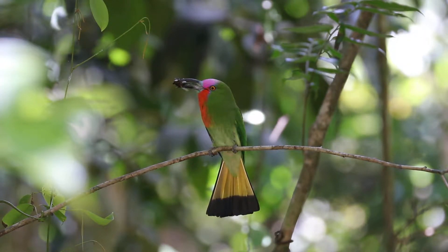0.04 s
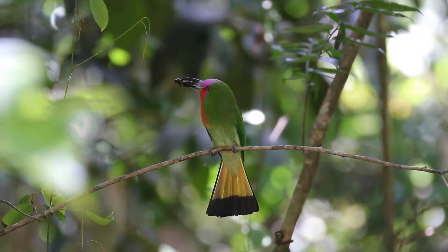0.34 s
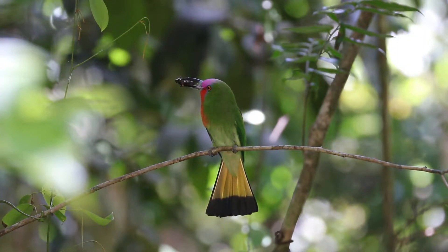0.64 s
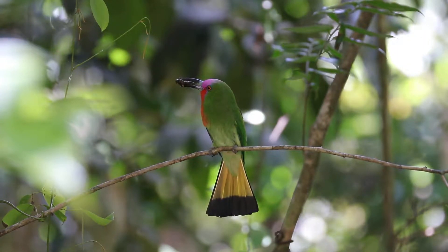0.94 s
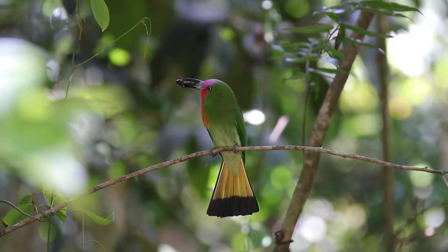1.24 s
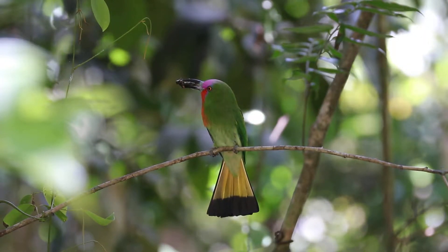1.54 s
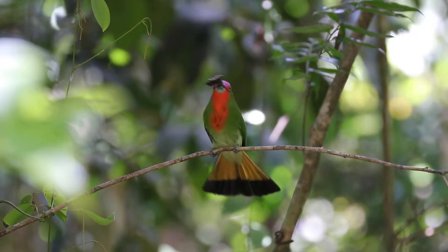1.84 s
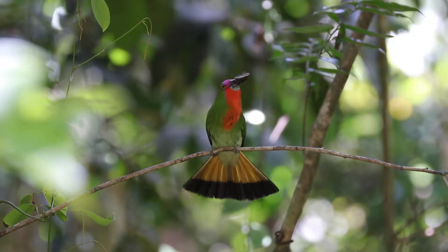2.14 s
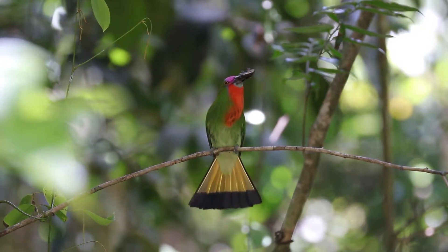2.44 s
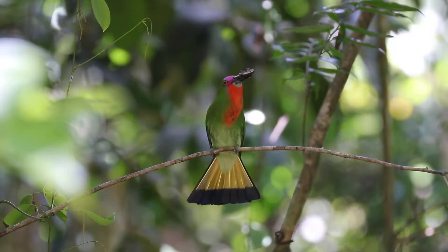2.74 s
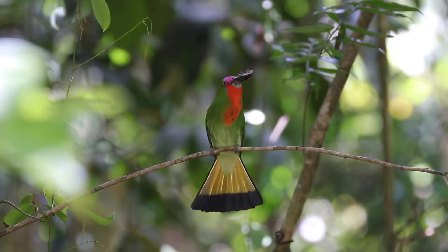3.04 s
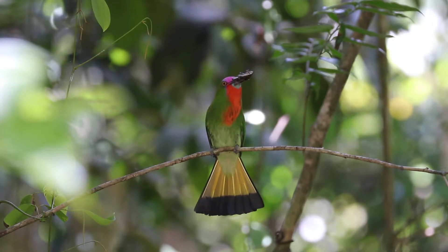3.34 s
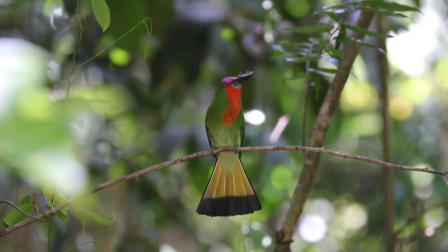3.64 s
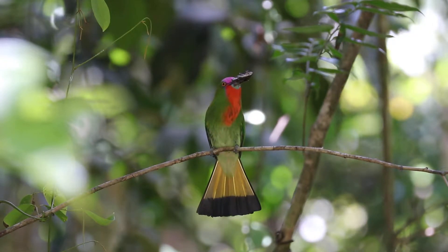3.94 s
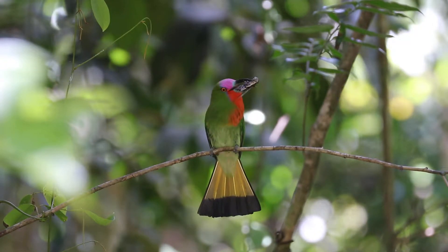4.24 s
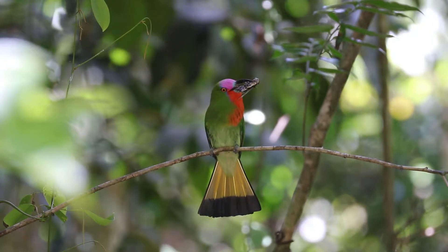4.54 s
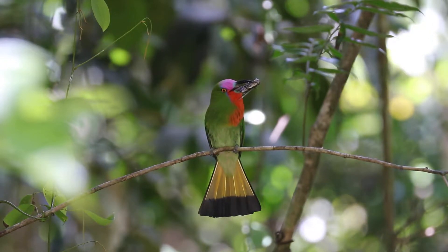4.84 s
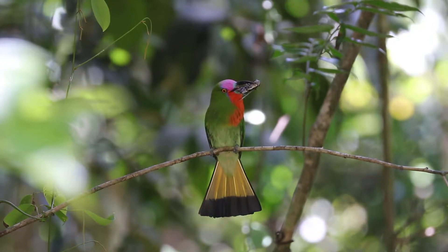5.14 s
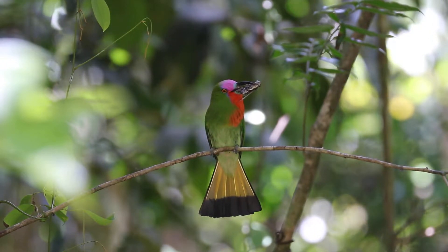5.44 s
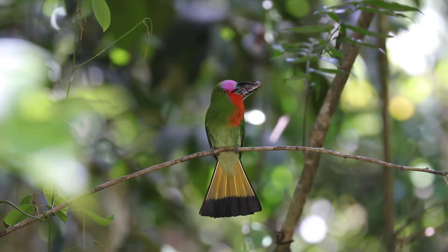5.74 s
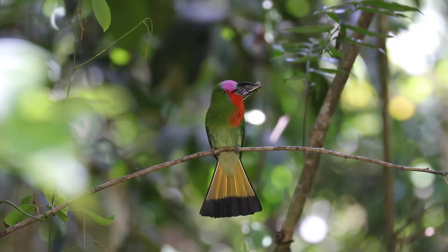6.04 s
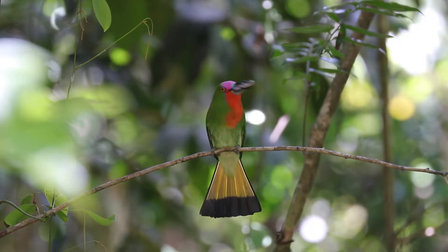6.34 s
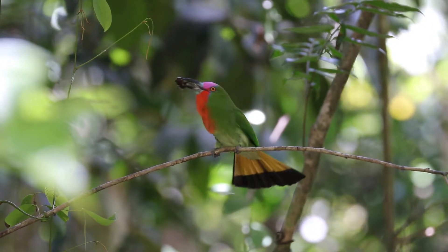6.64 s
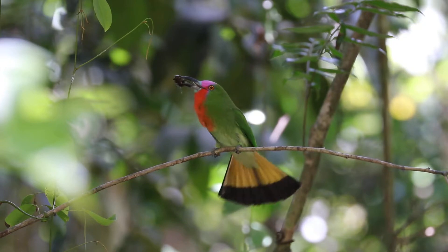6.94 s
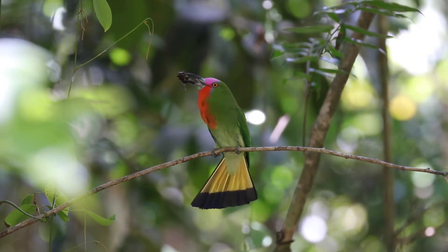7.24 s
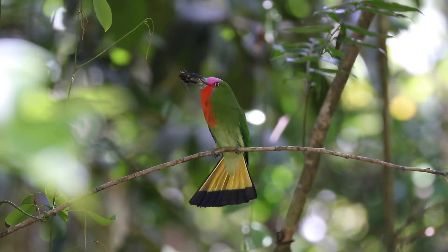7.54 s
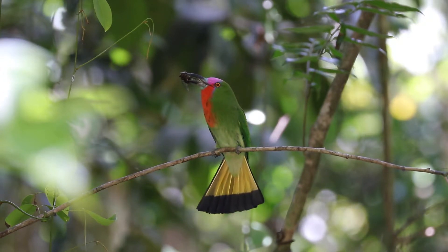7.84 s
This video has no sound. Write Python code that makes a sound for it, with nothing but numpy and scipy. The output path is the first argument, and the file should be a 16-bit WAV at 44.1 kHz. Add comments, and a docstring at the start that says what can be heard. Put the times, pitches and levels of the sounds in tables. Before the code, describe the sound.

A soft, even hiss of forest air and a thin, high, slightly throbbing insect drone run for the whole eight seconds, heard in stereo from one spot. At about 1.7 seconds a bird on a nearby branch gives a harsh rattle, much louder than the background: eight raspy notes in roughly one second, each lower, duller and softer, slowing slightly. Leaves and trunks add a short echo. A faint insect whine comes and goes around 2.7 seconds. Another insect's buzz swells from about 4.8 to 5.8 seconds, while a distant bird gives three faint falling chips at 5.0, 5.5 and 5.7 seconds. At 6.5 seconds the near bird repeats its descending rattle, fading by about 7.5 seconds. A faint low murmur rises beneath it, and another thin whine appears around 7.6 seconds as the insects carry on.

```python
"""Bee-eater in a humming forest

A stereo pair stands among trees, in the hiss of the air and the thin drone of insects' tymbals.
From a nearby branch a bee-eater rattles twice: eight harsh notes that sink in pitch and fade.
Each note is a train of very short syrinx bursts shaped by the throat; leaves and trunks scatter it.
Between the rattles, farther off, another bird chips three times."""
import sys
import numpy as np
from scipy import signal
from scipy.fft import rfft, irfft
from scipy.io import wavfile

SR = 44100
rng = np.random.default_rng(int(sys.argv[2]) if len(sys.argv) > 2 else 0)


def wrap_up_sound(samples):
    """Save the sound to the file named by the first command line argument, as 16-bit audio."""
    columns = np.atleast_2d(samples).T
    # keep every value between -1 and 1, then stretch to whole-number steps
    tamed = np.clip(columns, -1, 1)
    steps = np.round(tamed * 32767).astype(np.int16)
    wavfile.write(sys.argv[1], SR, steps)


N = 351918
TIME, FREQS = np.arange(N) / SR, np.fft.rfftfreq(N, 1 / SR) + 1e-3
SIDES = np.array([[1], [-1]])  # left and right microphone; a pan_db is left minus right


def undb(db):
    """Decibels to gain."""
    return 10 ** (np.asarray(db) / 20)


def unit(x):
    """Scale to rms 1."""
    return x / np.sqrt(np.mean(x ** 2))


def resonance(f, hz, width_hz):
    """Complex response of one resonance, gain 1 at the centre."""
    return 1 / (1 + 1j * (f ** 2 - hz ** 2) / (f * width_hz))


def noise(gain):
    """Unrelated noise at each microphone, with the given spectrum."""
    return irfft(rfft(rng.standard_normal((2, N))) * gain, N)


def wander(rate_hz):
    """A random drift with a spread near 1."""
    knots = rng.standard_normal(400)
    return 1.127 * np.interp(TIME * rate_hz, np.arange(len(knots)), knots)


def swell(middle_s, length_s):
    """A rise, a rounded hold and a fall."""
    return np.exp(-(2 * (TIME - middle_s) / length_s) ** 4)


def place(starts, sounds):
    """Lay sounds on the time line."""
    out = np.zeros(N + SR)
    for s, sound in zip(starts, sounds):
        out[int(s * SR):int(s * SR) + len(sound)] += sound
    return out[:N]


# The air all around the microphones: frequency_hz, density_db, pan_db, left_right_correlation
AIR_SPECTRUM = [(20, -89.2, 0.0, 0.66), (55, -78.6, 1.3, 0.81), (100, -83.2, 2.0, 0.33),
                (190, -83.3, 1.4, 0.48), (420, -84.7, 1.7, 0.26), (650, -89.3, 1.4, 0.13),
                (1300, -89.4, -0.8, 0.02), (2500, -86.8, -1.6, -0.18), (3800, -88.1, -1.3, -0.11),
                (5700, -90.2, -1.5, 0.06), (6600, -88.8, -1.8, 0.01), (7200, -84.8, -1.2, 0.02),
                (8600, -88.9, -3.8, 0.03), (11000, -92.1, -5.6, -0.0), (15300, -102.0, -5.5, 0.03)]


def forest_air(murmur_edge_hz=45, chorus_db=-65.5, flicker_db=2):
    """An even hiss, a low far murmur that swells late, and a flickering chorus of high insects."""
    hz, *columns = np.transpose(AIR_SPECTRUM)
    db, pan_db, correlation = (np.interp(np.log(FREQS), np.log(hz), c) for c in columns)
    mid, side = rfft(rng.standard_normal((2, N))) * np.sqrt((1 + SIDES * correlation) / 2)
    air = (mid + SIDES * side) * undb(db + SIDES * pan_db / 2) * np.sqrt(SR / 2)
    low = 1 / (1 + (FREQS / murmur_edge_hz) ** 2)
    hiss = irfft(air * (1 - low), N)
    murmur = irfft(air * low, N) * undb(-1 + 7.2 * swell(middle_s=7.1, length_s=3.5))
    chorus = unit(noise(resonance(FREQS, 7180, 470) ** 2 + .12 * resonance(FREQS, 7870, 400) ** 2))
    return hiss + murmur + chorus * undb(chorus_db + flicker_db * (wander(3.4) + wander(4.2)))


# The drone as it reaches the microphones: time_s, level_db
DRONE_LEVELS = [(0.0, -51.5), (0.11, -56), (0.51, -52), (3.53, -57), (4.67, -55), (4.85, -62), (6.05, -51),
                (6.07, -54), (7.47, -54.5), (7.67, -58.5), (7.98, -53)]
# How the drone's loudness wavers between left and right: time_s, pan_db
DRONE_BALANCE = [(0.0, -4), (3.56, 3), (6.22, -5.5), (6.6, 2), (6.65, -1), (7.98, -2.5)]
# Body resonances, each applied three times over: pitch_hz, half_width_hz, relative_db
BODY_MODES = [(4757, 46, 0), (4245, 60, -14), (5280, 70, -17)]


def droning_insects(throb_hz=24.1, throb_depth=.3):
    """Sharply tuned bodies kept ringing by tymbals that throb; the forest smears the phase."""
    db, pan_db = (np.interp(TIME, *np.transpose(curve)) for curve in (DRONE_LEVELS, DRONE_BALANCE))
    body = sum(undb(mode_db) * unit(abs(resonance(FREQS, hz, 2 * half_width)) ** 3)
               for hz, half_width, mode_db in BODY_MODES)
    ring = unit(noise(body))
    ring /= np.sqrt(abs(signal.hilbert(ring)) + .4)  # a singer is steadier than plain noise
    throb = np.sin(2 * np.pi * np.cumsum(throb_hz * (1 + .0315 * wander(2.17))) / SR)
    song = ring * (1 + throb_depth * np.array([[.5], [1]]) * throb)  # half as deep on the left
    return song / np.mean(abs(song.mean(axis=0))) * undb(db + SIDES * pan_db / 2)


# Lines of the buzz, one click rate apart: pitch_hz, relative_db
BUZZ_COMB = [(4215, -70), (4344, -67), (4479, -62), (4608, -64), (4743, -61), (4872, -65), (5001, -67),
             (5136, -65)]
# Its swells at the microphones, added to the resting buzz: middle_s, length_s, level_db
BUZZ_RISES = [(3.3, 1.3, -66.5), (5.27, 1.0, -55)]


def buzzing_insect(rest_db=-66, waver=.001265, pan_db=-2):
    """Regular tymbal clicks make a comb of lines that swells faintly, then strongly."""
    # the path to each microphone wavers on its own
    clock = np.cumsum(1 + waver * np.array([wander(25), wander(25)]), axis=1) / SR
    lines = sum(undb(db + 2 * wander(4.7)) * np.sin(2 * np.pi * (hz * clock + rng.random((2, 1))))
                for hz, db in BUZZ_COMB)
    loudness = undb(rest_db) + sum(undb(db) * swell(s, length) for s, length, db in BUZZ_RISES)
    return unit(lines) * loudness * undb(SIDES * pan_db / 2)


# The bee-eater's tone at the syrinx: harmonic, relative_db
SYRINX_PARTIALS = [(1, -6.5), (2, -11), (3, -6), (4, 0), (5, -26)]


def syrinx(t, length_s, rate_hz, tone_hz, onset_db, fade_db, burst_s=.00474, jitter_s=.000203):
    """Membranes open in quick uneven bursts of falling tone; gives rasping tone, overtones and gate."""
    beats = np.arange(16)[:, None] / rate_hz
    late, loud, sharp, wide = rng.standard_normal((len(beats), 4)).T[:, :, None]
    start = .0001 + beats * (1 + 1.357 * beats) + jitter_s * late  # the bursts slow down
    progress = start / length_s
    hz = tone_hz * (1 + .268 * (.5 - progress) + .059 * sharp)  # the pitch sinks through the note
    age = np.clip((t - start) / (burst_s * np.exp(.14 * wide)), 0, 1)  # 0 to 1 through each burst
    size = undb(onset_db * np.exp(-start / .011) + fade_db * progress ** 2 + .6 * loud)
    within_note = np.clip((length_s - start) * rate_hz, 0, 1)
    opening = size * within_note * np.sin(np.pi * age ** .63)  # opens fast, closes more slowly
    phase = 2 * np.pi * hz * (t - start) * (1 + .26 * (2 / 3 - age))  # each burst slides down too
    tone = sum(undb(db) * opening * np.sin(k * phase) for k, db in SYRINX_PARTIALS).sum(axis=0)
    overtones = sum(opening * np.sin(k * phase + k * k) for k in range(7, 13)).sum(axis=0)
    gate = opening.sum(axis=0)
    rasp = undb(-10) * gate * rng.standard_normal(len(t))
    return tone + rasp, unit(overtones) * np.sqrt(np.mean(gate ** 2)), gate


# Windpipe and beak, ringing alike in every note: pitch_hz, width_hz, relative_db
AIRWAY_MODES = [(1280, 380, -7), (2060, 480, -2)]


def note(length_s, rate_hz, tone_hz, throat_hz, onset_db, fade_db, throat_width_hz=1170):
    """Syrinx bursts ring the airway and a throat resonance that glides between two pitches."""
    t = np.arange(SR // 7) / SR
    f = np.fft.rfftfreq(len(t), 1 / SR) + 1e-3
    tone, overtones, gate = syrinx(t, length_s, rate_hz, tone_hz, onset_db, fade_db)
    source = rfft(tone)
    for hz, width_hz, db in AIRWAY_MODES:
        source *= 1 + undb(db) * resonance(f, hz, width_hz)
    leak = undb(-12.5) * resonance(f, 850, 920)
    glide = 2 * np.clip(t / length_s, 0, 1) ** .8  # crossfades three throat shapes
    voice = np.zeros(len(t))
    for k, centre_hz in enumerate(np.linspace(*throat_hz, 3)):
        throat = resonance(f, centre_hz, throat_width_hz) ** 2 - leak
        steep_edge = 1 / np.sqrt(1 + (f / (1.115 * centre_hz)) ** 10)
        voice += unit(irfft(source * throat * steep_edge, len(t))) * np.clip(1 - abs(glide - k), 0, 1)
    spill = unit(irfft(source * resonance(f, 3630, 1060) ** 2, len(t)))  # a little gets past the throat
    voice += undb(-20) * min(tone_hz / 800, 1) ** 2 * spill
    voice *= np.sqrt(np.sum(gate ** 2) / np.sum(voice ** 2))
    bright_bands = resonance(f, 8300, 2600) ** 2 + undb(-3.5) * resonance(f, 10600, 3600) ** 2
    sizzle = irfft(rfft(overtones) * bright_bands, len(t))
    return voice + undb(-15.5) * (tone_hz / 720) ** 2 * sizzle  # hard, high notes sizzle most


def by_effort(slack, full, effort, bend=1):
    """A value between slack and full, for an effort of 0 to 1."""
    return slack + (full - slack) * max(effort, 0) ** bend


def rattle(start_s, gap_s, growth_s, level_db, fade_db, fade_bend, effort_sag=.27, last_note_s=.12):
    """The bird runs out of effort: its eight notes come later, longer, lower, duller and softer."""
    starts, notes = [], []
    for k, effort in enumerate(np.linspace(1, 0, 8)):
        sound = note(length_s=by_effort(.066, .047, effort) if effort > 0 else last_note_s,
                     rate_hz=by_effort(132, 172, effort),
                     tone_hz=by_effort(630, 1127, effort, bend=1.86),
                     throat_hz=[by_effort(1137, 2797, e, bend=.72) for e in (effort, effort - effort_sag)],
                     onset_db=by_effort(7, -6, effort), fade_db=by_effort(-9, -6, effort))
        starts.append(start_s + k * gap_s + growth_s * k * (k - 1) / 2)
        notes.append(sound * undb(level_db + fade_db * (1 - effort) ** fade_bend))
    return place(starts, notes)


def scatter(x, t60_s, build_s):
    """Echoes from countless surfaces, different at each microphone."""
    t = np.arange(SR) / SR
    echoes = rng.standard_normal((2, SR)) * undb(-60 * t / t60_s) * (1 - np.exp(-(t / build_s) ** 2))
    echoes /= np.sqrt(np.sum(echoes ** 2, axis=1, keepdims=True))
    return signal.oaconvolve(x[None], echoes, axes=1)[:, :N]


# Calls from the branch: start_s, first_gap_s, gap_growth_s, level_db, fade_db, fade_bend (1 is even)
BRANCH_CALLS = [(1.727, .1060, .0042, -26, -18.5, 2.18), (6.478, .110, .003, -26, -18.5, 1.8)]
# Echoes off the ground and near stems: left_delay_s, left_db, right_delay_s, right_db
NEAR_ECHOES = [(0.00248, -14, 0.00164, -18), (0.00272, -12, 0.00578, -12), (0.004, -16, 0.00652, -18),
               (0.00582, -14, 0.00748, -18), (0.00654, -14, 0.00904, -18), (0.00742, -18, 0.01364, -16)]


def bee_eater(left_lag_s=.00005, leaves_db=1, trunks_db=-4.5):
    """The direct call, a few near echoes, quick scatter from leaves and a longer tail from the trunks."""
    call = sum(rattle(*row) for row in BRANCH_CALLS)
    spectrum = rfft(call)
    pan_db = np.interp(FREQS, [1300, 2400], [2.6, -1.5])
    lag = np.exp(-1j * np.pi * FREQS * left_lag_s * SIDES)
    direct = irfft(spectrum * undb(SIDES * pan_db / 2) * lag, N)
    near = sum(np.array([undb(db) * np.roll(call, round(s * SR)) for s, db in (row[:2], row[2:])])
               for row in NEAR_ECHOES)
    leaves = scatter(irfft(spectrum * resonance(FREQS, 2000, 3200), N), t60_s=.12, build_s=.0012)
    trunks = scatter(irfft(spectrum * resonance(FREQS, 2030, 3100), N), t60_s=.49, build_s=.047)
    return direct + near + undb(leaves_db) * leaves + undb(trunks_db) * trunks


# Other insects, faint at the microphones: middle_s, length_s, pitch_hz, level_db
INSECT_WHINES = [(2.7, 1.1, 4472, -57), (7.6, 0.69, 4250, -55.5)]


def whining_insects(waver=.00089):
    """Single thin tones that come and go."""
    whines = np.zeros((2, N))
    for middle_s, length_s, hz, db in INSECT_WHINES:
        cycles = hz * np.cumsum(1 + waver * wander(22)) / SR + rng.random((2, 1))
        whines += undb(db) * swell(middle_s, length_s) * np.sin(2 * np.pi * cycles)
    return whines


# A bird far off among the trees: start_s, pitch_hz, relative_db, fall_share (of the pitch)
FAR_CHIPS = [(4.99, 2400, -52.5, .4), (5.485, 2270, -51.5, 0.087), (5.74, 2400, -53, 0.44)]


def far_bird(length_s=.045):
    """Short falling chips that reach the microphones only as scatter from the trees."""
    t = np.arange(int(length_s * SR)) / SR
    starts, chips = [], []
    for start_s, hz, db, fall in FAR_CHIPS:
        phase = 2 * np.pi * hz * t * (1 + fall * (1 - t / length_s) / 2)
        starts.append(start_s)
        chips.append(undb(db) * np.hanning(len(t)) * np.sin(phase))
    return 2 * scatter(place(starts, chips), t60_s=.14, build_s=.005)


def scene():
    """Two birds over the insects and the air, heard from one spot in the forest."""
    birds = bee_eater() + far_bird()
    insects = droning_insects() + buzzing_insect() + whining_insects()
    return birds + insects + forest_air()


def record(dry, top_hz=15750):
    """The recorder cuts the top steeply."""
    return signal.sosfilt(signal.ellip(12, .1, 70, top_hz, fs=SR, output="sos"), dry)


dry = scene()
out = record(dry)
wrap_up_sound(out)
```